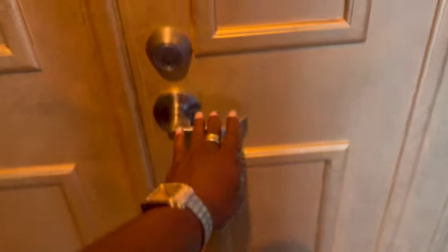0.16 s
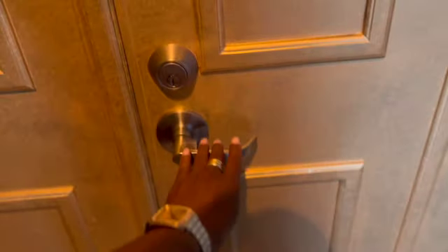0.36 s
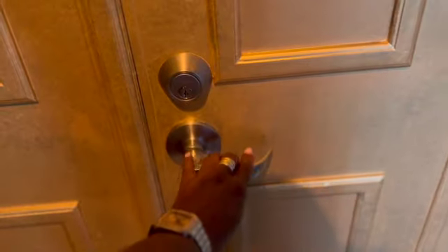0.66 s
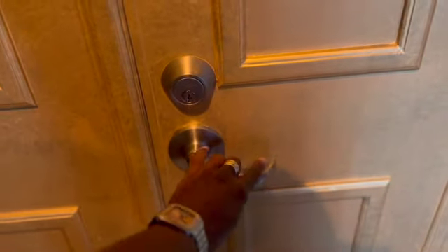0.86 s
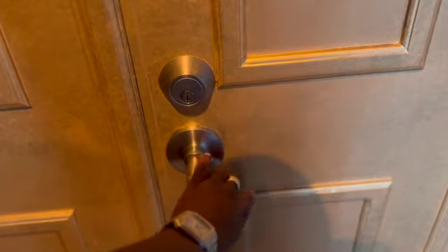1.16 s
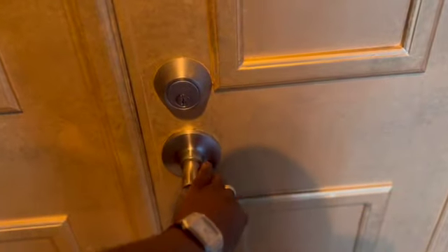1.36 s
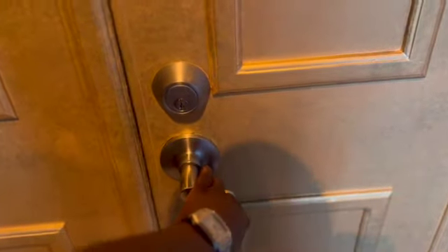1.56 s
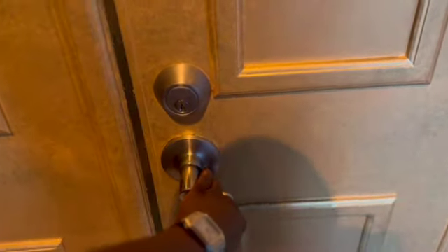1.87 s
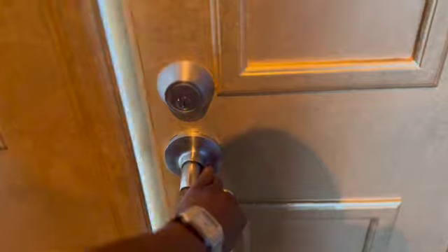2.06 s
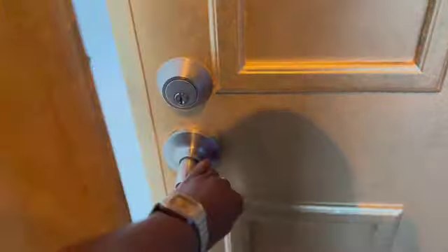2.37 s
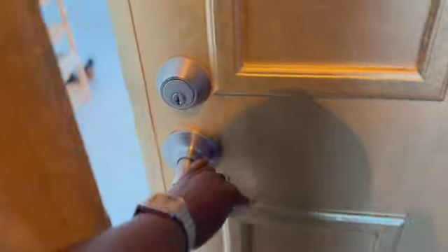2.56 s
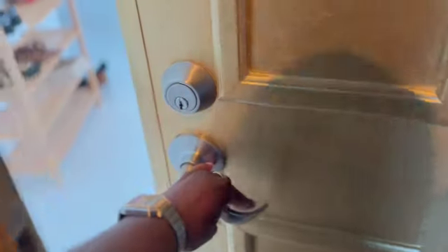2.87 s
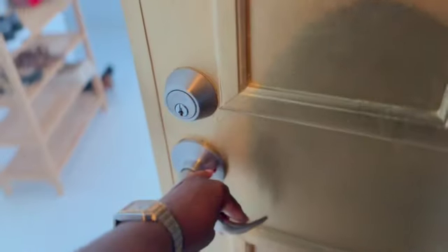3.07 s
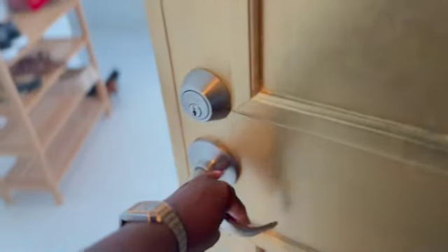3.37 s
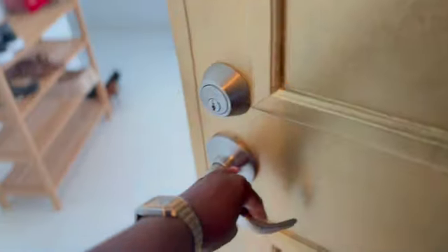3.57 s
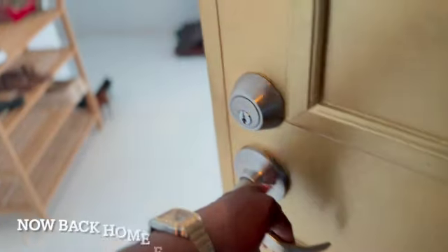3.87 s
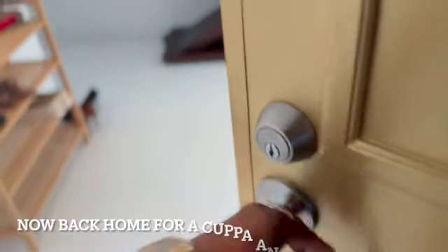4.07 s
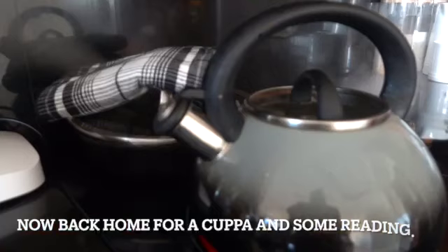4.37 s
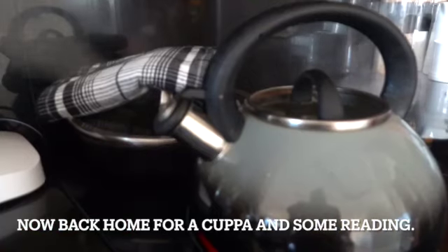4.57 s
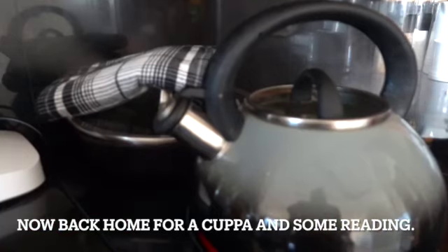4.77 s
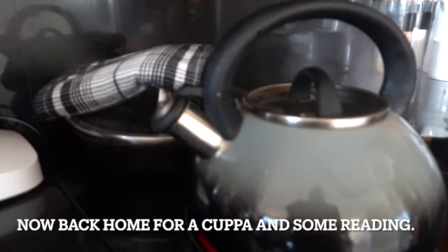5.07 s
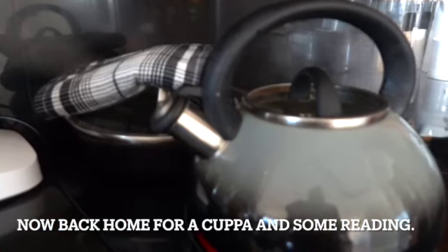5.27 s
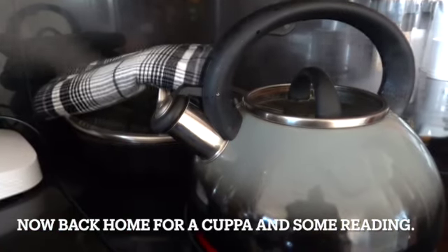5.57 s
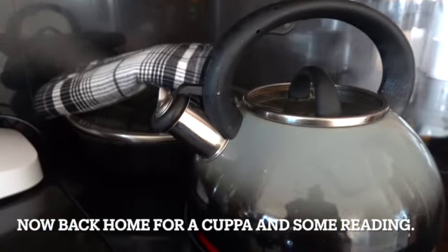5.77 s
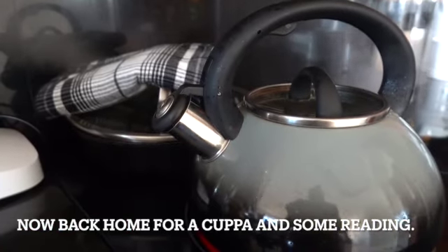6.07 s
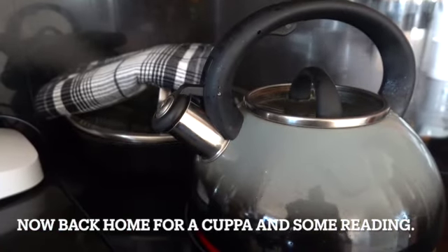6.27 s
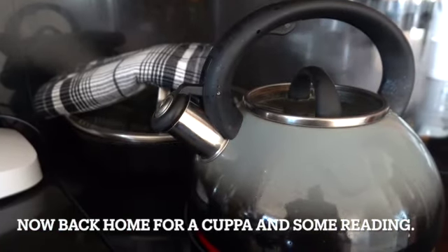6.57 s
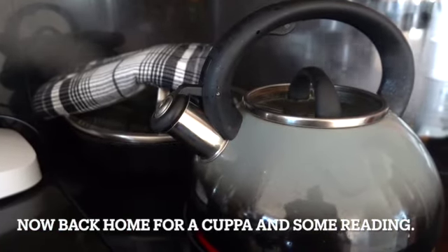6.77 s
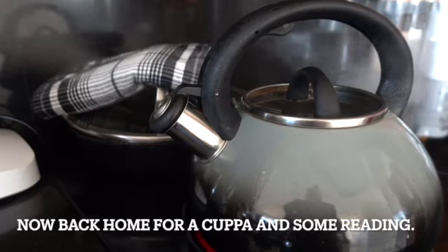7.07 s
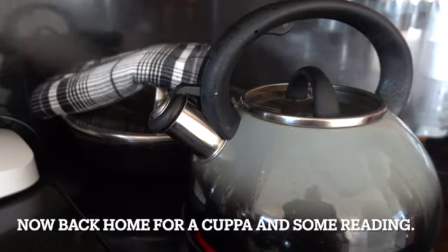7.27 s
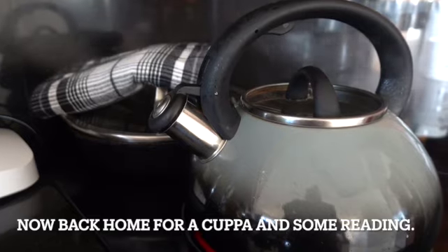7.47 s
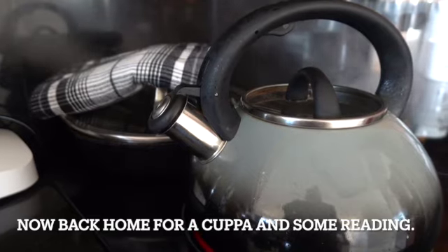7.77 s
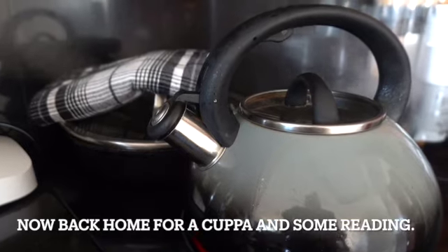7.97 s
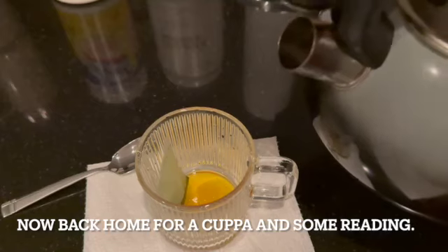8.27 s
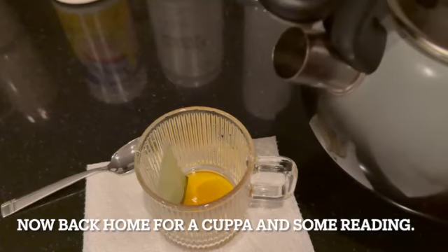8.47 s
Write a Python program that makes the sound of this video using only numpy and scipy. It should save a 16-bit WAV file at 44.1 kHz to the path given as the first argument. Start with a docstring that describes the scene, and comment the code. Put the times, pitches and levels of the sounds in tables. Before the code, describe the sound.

Soft hand rustle and metallic latch clacks over low hallway hum, abruptly followed by a loud, wavering kettle whistle with steam, then near silence.

```python
"""Low building hum and rumble at a front door, heard through a phone's two microphone ports.
A hand swishes and rustles, lever and latch click, thin metal squeaks and the door swings: noise bands and ringing modes.
Then, close up, a kettle at the boil: two whistle modes multiply into sum and difference tones
over steam hiss and a low boil. A cut leads to a quiet kitchen, a steady bed of coloured noise."""
import sys
import numpy as np
from scipy import signal
from scipy.fft import rfft, irfft, next_fast_len
from scipy.io import wavfile
from scipy.ndimage import uniform_filter1d

SR = 44100
rng = np.random.default_rng(int(sys.argv[2]) if len(sys.argv) > 2 else 0)


def decibels_to_gain(level_db):
    """Convert a level in decibels to a linear amplitude gain (20 dB per decade)."""
    exponent = np.asarray(level_db, float) / 20
    return 10 ** exponent


def dump_mix(stems):
    """Bounce the given channels to the path in sys.argv[1] as a 16-bit WAV at rate SR."""
    frames = np.atleast_2d(stems).T  # one column per channel
    limited = np.clip(frames, -1, 1)  # hard clip at full scale
    pcm = np.round(limited * 32767).astype(np.int16)
    wavfile.write(sys.argv[1], SR, pcm)


N = 380935
T = np.arange(N) / SR
DOOR_END_S, KETTLE_END_S = 4.4, 8.187

# how alike the two ports hear the hallway: (frequency [Hz], left-right likeness [0-1])
HALL_ALIKE = [(30, 1), (130, 0.87), (400, 0.36), (1500, 0), (15000, 0.16)]
# how alike they hear steam and kitchen: (frequency [Hz], left-right likeness [0-1])
STEAM_ALIKE = [(30, 0.76), (1500, 1), (3000, 0.5), (5000, 0.4), (7000, 0.06), (9500, 0.3), (14000, 0.55)]
# hand and sleeve swish: (time [s], level [dB])
HAND_SWISH = [(0.0, -78), (0.58, -81.5), (0.95, -71), (1.08, -62.5), (1.22, -65), (1.36, -60),
              (1.54, -68.5), (1.77, -69), (1.95, -63.5), (2.35, -71.5), (2.59, -69.5), (3.05, -78),
              (3.5, -71), (3.67, -77), (4.1, -65), (4.38, -62.5)]


def columns(table):
    """Each column of a curve table, sample by sample."""
    s, *rest = np.transpose(table)
    return [np.interp(T, s, c) for c in rest]


def on_log(points, hz):
    """A (frequency [Hz], value) table read on a log-frequency axis."""
    f, v = np.transpose(points)
    return np.interp(np.log(hz + 1e-3), np.log(f), v)


def noise(points, alike=((1, 1),), left=((1, 0),)):
    """Two channels of coloured noise, rms 1 overall, with likeness and balance set per frequency."""
    size = next_fast_len(N)
    hz = np.fft.rfftfreq(size, 1 / SR)
    inside = (hz >= points[0][0]) & (hz <= points[-1][0])
    likeness = np.clip(on_log(alike, hz), 0, 1)
    mid, side = rfft(rng.standard_normal((2, size)))
    sign = np.array([[1], [-1]])
    pair = np.sqrt(1 + likeness) * mid + np.sqrt(1 - likeness) * side * sign
    colour = decibels_to_gain(on_log(points, hz) + sign * on_log(left, hz) / 2) * inside
    x = irfft(pair * colour, size)[:, :N]
    return x / x.std()


def wander(lo_hz, hi_hz, fall_db):
    """Random motion between two rates, spread 1, weaker by fall_db per Hz at the fast end."""
    return noise([(lo_hz, 0), (hi_hz, -fall_db)])[0]


def pan(x, db):
    """Left minus right level difference in dB."""
    return x * decibels_to_gain(np.array([[db / 2], [-db / 2]]))


def gate(start_s, end_s, rise_s, fall_s):
    """Linear fades of a scene cut."""
    return np.clip((T - start_s) / rise_s, 0, 1) * np.clip((end_s - T) / fall_s, 0, 1)


def ring(modes, t, centre_hz, skirt_db):
    """One blow on a table of modes, peak 1; modes far from the centre are struck less, and all vary a little."""
    hz, db, t60 = np.transpose(modes)[:, :, None]
    chance = rng.standard_normal((3, len(modes), 1))
    db = db + 3.3 * chance[0] - skirt_db * np.abs(np.log2(hz / centre_hz))
    hz = hz * (1 + 0.009 * chance[1])
    x = decibels_to_gain(db - 60 * t / t60) * np.sin(2 * np.pi * hz * t + chance[2])
    x = x.sum(0) * (1 - np.exp(-t / 0.00047))
    return x / np.abs(x).max()


def door_opening():
    """How far the door has swung open, 0 to 1."""
    opens_s, swing_s = 1.67, 0.8
    return np.clip((T - opens_s) / swing_s, 0, 1)


def rumble():
    """The stairwell rumble, low noise that thins once the door stands open."""
    # (frequency [Hz], relative density [dB per Hz])
    rumble_colour = [(13, -40), (22, -20), (43, -1), (54, -10), (68, 1), (102, -9.5), (130, -40),
                     (220, -120)]
    shut_db, open_db = -50, -55.5
    level_db = shut_db + (open_db - shut_db) * door_opening() + 1.7 * wander(1.2, 5.1, 4.7)
    return pan(decibels_to_gain(level_db) * noise(rumble_colour, HALL_ALIKE), -3.5)


def mains_hum():
    """Mains hum: steady sines that waver in level and phase."""
    # (frequency [Hz], level [dB])
    hum_tones = [(59, -51), (119, -51.5), (177, -64), (238, -65.5)]
    out = np.zeros((2, N))
    for hz, db in hum_tones:
        level_db = db + 2.66 * wander(0.98, 11, 15)
        turns = hz * T + 0.08 * wander(0.86, 9.7, 9)
        out += pan(decibels_to_gain(level_db) * np.sin(2 * np.pi * turns), -3.0)
    return out


def room_air():
    """Low hallway noise that rises and falls gently with the hand's swish."""
    # (frequency [Hz], relative density [dB per Hz])
    air_colour = [(64, -30), (108, -5.5), (277, -11), (379, -17.5), (563, -17.5), (613, -14.5),
                  (819, -28.5), (1050, -20.5), (1400, -29), (1820, -82), (3080, -120)]
    swish_db, = columns(HAND_SWISH)
    air_db = -52 + 0.29 * (swish_db + 70)  # -52 dB at a swish of -70 dB
    air_db = air_db + 0.89 * wander(3.3, 37, 4.1)
    return pan(decibels_to_gain(air_db) * noise(air_colour, HALL_ALIKE), -2.2)


def rustles():
    """Level envelopes of body and crisp top: each rustle swells to its peak and dies away."""
    # cloth and skin: (time of peak [s], body level [dB], crisp top level [dB], fall t60 [s])
    rustle_peaks = [(0.64, -85, -80, .1), (0.76, -82, -72, .2), (0.82, -79, -67, .15),
                    (1.0, -64, -72, 0.38), (1.08, -65, -71, 0.1), (1.15, -62, -70, 0.11),
                    (1.19, -54, -70, 0.21), (1.32, -62, -79, 0.51), (1.45, -66, -76, 0.23),
                    (1.505, -48, -56, .12), (1.55, -64, -70, .6), (1.73, -47, -63, 0.1),
                    (1.775, -56.5, -70, .3), (2.13, -71, -80, 0.75), (2.26, -60, -73, .2),
                    (2.62, -68, -74, 1.1), (3.17, -72, -92, 1.2), (3.47, -68, -78, 0.72),
                    (3.39, -78, -77, .5), (3.64, -78, -77, 0.73), (3.81, -72, -90, 0.59),
                    (4.12, -83, -85, 0.38), (4.27, -61, -67.5, 1.4)]
    rise_share = 0.39  # rise time against fall time
    out = 0
    for s, body_db, crisp_db, t60 in rustle_peaks:
        away = np.where(T > s, T - s, (s - T) / rise_share) / t60
        out = out + decibels_to_gain(np.array([[body_db], [crisp_db]]) - 60 * np.minimum(away, 3))
    return out


def hand():
    """Hand and sleeve: noise bands of swish and rustle that share one fast grain."""
    # four bands, each (frequency [Hz], relative density [dB per Hz])
    swish_colour = [(2150, -14), (2650, 1.5), (3100, -0.5), (3700, -11)]
    low_swish_colour = [(1250, 1.5), (1400, -4.5), (1750, -1), (2000, -5), (2250, -15)]
    rustle_colour = [(2410, -21), (4100, 0), (4960, -4), (6120, -3.5), (7490, -12.5), (9000, -14.5),
                     (11700, -55.5), (19800, -120)]
    crisp_colour = [(5180, -43), (8800, -5), (9330, 2.5), (10300, -24), (11300, -6), (13700, -3),
                    (15700, 1)]
    swish_db, = columns(HAND_SWISH)
    nearness = np.clip((T - 4.02) / 0.15, 0, 1)  # the hand comes back past the phone
    low_swish_db = swish_db + 7 * nearness
    body, crisp = rustles()
    body = body + decibels_to_gain(swish_db - 5)  # a steady rustle bed under the peaks
    crisp = crisp + decibels_to_gain(swish_db - 18)
    grain_db = 2.0 * wander(7.5, 270, 12)
    out = pan(decibels_to_gain(swish_db + 0.64 * grain_db) * noise(swish_colour, HALL_ALIKE), -1.4)
    out += pan(decibels_to_gain(low_swish_db + 0.48 * grain_db) * noise(low_swish_colour, HALL_ALIKE), -1.8)
    out += pan(body * decibels_to_gain(grain_db) * noise(rustle_colour, HALL_ALIKE), -0.84)
    out += pan(crisp * decibels_to_gain(1.1 * grain_db) * noise(crisp_colour, HALL_ALIKE), -1.2)
    return out


def knocks():
    """Each knock rings latch and panel, ticks, and leaves a short scatter from the hallway walls."""
    # lever, latch and door: (time [s], latch level [dB], tick level [dB], door panel level [dB],
    # frequency near which the latch modes ring most [Hz])
    blows = [(0.2, -66, -85, -55, 711), (0.683, -46.5, -85, -47, 1030), (0.908, -47.5, -61.5, -65, 1360),
             (1.02, -45, -73, -45, 1090), (1.193, -29, -50.5, -51, 990), (1.215, -36.5, -56.5, -36.5, 710),
             (1.238, -45.5, -63.5, -56, 840), (1.5, -32, -35, -46.5, 1070), (1.725, -39, -44, -43.5, 2750),
             (1.766, -33.5, -52.5, -49, 3000), (1.789, -28, -64.5, -49.5, 1040),
             (1.82, -44, -63.5, -54, 1030), (1.858, -44, -70, -56, 1010), (1.899, -39, -68, -66, 1200),
             (2.148, -47.5, -66.5, -31.5, 1150), (2.272, -39, -51, -46.5, 1090),
             (2.67, -43, -69, -44.5, 999), (2.996, -52, -78, -47, 716), (3.159, -51, -75.5, -47, 746),
             (3.492, -50, -72.5, -48, 746), (4.261, -35, -65.5, -49, 1100)]
    # metal latch and door panel: (frequency [Hz], relative level [dB], t60 [s])
    latch_modes = [(752, 4.5, 0.081), (1070, 4, 0.061), (1110, 7, 0.099), (1435, 5, 0.043),
                   (1760, 6.5, 0.04), (2700, 7.5, 0.035), (3000, 10, 0.041), (4500, -21, 0.038),
                   (5450, -2, 0.064)]
    panel_modes = [(191.6, -2.5, 0.21), (270, -2.5, 0.29), (319, -6.5, 0.27), (370, -8, 0.37),
                   (490, -3.5, 0.19), (643, -5.5, 0.1)]
    out, t = np.zeros((2, N)), T[:SR // 3]
    scatter = noise([(500, -4), (1100, 5), (1600, -5), (3200, -15.5), (3900, -3)], ((1, 0.25),))
    hiss = noise([(3900, -20), (4800, 8.0), (8000, -12), (15500, -8.5)], ((1, .6),))
    boom = noise([(130, 0), (280, -4), (520, 1.0), (700, -7)], ((1, 0.5),))
    tail = decibels_to_gain(-60 * t / 0.27)
    tick_fall, boom_fall = decibels_to_gain(-60 * t / 0.011), decibels_to_gain(-60 * t / 0.58)
    for s, latch_db, tick_db, panel_db, hz in blows:
        here = slice(int(s * SR), int(s * SR) + len(t))
        latch = ring(latch_modes, t, hz, 10.4) + 0.26 * tail * scatter[:, here]
        tick = (1.5 * tick_fall + 0.051 * tail) * hiss[:, here]
        panel = 0.88 * ring(panel_modes, t, 300, .1) + 0.17 * boom_fall * boom[:, here]
        out[:, here] += pan(decibels_to_gain(latch_db) * latch + decibels_to_gain(tick_db) * tick, -1)
        out[:, here] += pan(decibels_to_gain(panel_db) * panel, -4.5)
    return out


def squeaks():
    """Thin metal ring and lever squeak: short unsteady tones, the rougher the stronger their octave."""
    # (time [s], pitch [Hz], level [dB], rise [s], t60 [s], unsteadiness [0-1])
    squeak_tones = [(1.062, 7590, -42.5, .02, 0.15, 0.2), (1.311, 2700, -40, .005, .1, 0.6),
                    (1.33, 2720, -47, .005, 0.092, 0.3), (1.352, 2560, -47, .005, 0.078, 0.55),
                    (1.31, 2250, -44.5, .008, .28, .55), (1.501, 5560, -50, .003, 0.36, 0.42)]
    clean_db, rough_db = -50, 10  # octave against fundamental at unsteadiness 0 and 1
    out = 0
    for s, hz, db, rise, t60, rough in squeak_tones:
        octave_db = clean_db + (rough_db - clean_db) * rough
        t = np.maximum(T - s, 0)
        pitch_hz = hz * (1 + 0.066 * rough ** 2 * wander(22, 390, 6.0))
        phase = 2 * np.pi * np.cumsum(pitch_hz) / SR
        fall_db = db - 60 * np.maximum(t - rise, 0) / t60
        shape = np.minimum(t / rise, 1) * decibels_to_gain(fall_db + 5.0 * rough * wander(30, 300, 3))
        out = out + shape * (np.sin(phase) + decibels_to_gain(octave_db) * np.sin(2 * phase))
    return out


def indoors():
    """Low murmur of the rooms, let out as the door opens."""
    # (frequency [Hz], relative density [dB per Hz])
    murmur_colour = [(120, -12), (160, 0), (280, -3), (380, -16)]
    level_db = -59 + 1.5 * wander(2, 20, 4)
    return pan(door_opening() * decibels_to_gain(level_db) * noise(murmur_colour, HALL_ALIKE), -3)


def airy_puffs():
    """Soft puffs of noise near 6 kHz, each a bell-shaped swell."""
    # (time of peak [s], level [dB], half length [s])
    puff_peaks = [(2.64, -70, .05), (3.17, -67, .07), (3.49, -68, .06), (3.82, -67, .06)]
    # (frequency [Hz], relative density [dB per Hz])
    puff_colour = [(4600, -20), (5300, -4), (5900, 0), (6400, -3), (6900, -20)]
    swell = sum(decibels_to_gain(db) * np.exp(-((T - s) / half) ** 2) for s, db, half in puff_peaks)
    return pan(swell * noise(puff_colour, HALL_ALIKE), -1.5)


def hallway():
    """Everything at the front door, with a dead band near 4 kHz and the right port hearing it first."""
    door = rumble() + mains_hum() + room_air() + hand() + knocks() + squeaks() + indoors() + airy_puffs()
    dead_band = signal.butter(2, [3450, 4350], "bandstop", fs=SR, output="sos")
    door = signal.sosfilt(dead_band, door)
    door[0] = np.roll(door[0], 17)  # left lags, in samples
    return door


def turning(hz):
    """A unit phasor that turns at a changing frequency."""
    return np.exp(2j * np.pi * np.cumsum(hz) / SR)


def whistle_modes():
    """A strong self-sustained upper mode and a ragged lower one, as phasors, and the upper mode's drifting pitch."""
    # upper mode as the steam jet wanders: (time [s], pitch [Hz])
    upper_pitch = [(4.41, 4058), (4.53, 4030), (4.57, 3902), (4.77, 3865), (4.81, 4001), (5.17, 3999),
                   (5.33, 4174), (5.38, 4066), (5.45, 4114), (5.54, 3961), (5.8, 4013), (5.92, 3913),
                   (5.93, 4009), (6.29, 4026), (6.39, 4189), (6.5, 4010), (6.55, 4003), (6.64, 3793),
                   (6.76, 3862), (6.77, 3968), (6.89, 4076), (6.93, 4023), (7.26, 3998), (7.27, 3960),
                   (7.36, 4172), (7.47, 4142), (7.51, 4022), (7.63, 3957), (7.69, 3835), (7.73, 3948),
                   (7.99, 4064), (8.17, 3965)]
    # lower mode, strongest while the upper one sags: (time [s], level [dB])
    lower_level = [(4.41, -48), (4.44, -41), (4.55, -41), (4.59, -28.5), (4.72, -27.5), (4.77, -38),
                   (4.84, -31), (4.865, -42), (4.92, -30), (4.99, -38), (5.11, -30), (5.22, -43),
                   (5.46, -43), (5.59, -31), (5.8, -33), (5.92, -28.5), (5.96, -42), (6.02, -33),
                   (6.29, -36), (6.42, -42), (6.51, -33.5), (6.56, -39), (6.59, -29.5), (6.77, -32),
                   (6.89, -43), (6.97, -32), (7.12, -40), (7.19, -33), (7.24, -40), (7.3, -31), (7.35, -46),
                   (7.61, -36), (7.69, -42), (7.72, -30), (7.84, -32), (8.0, -45), (8.03, -43), (8.1, -36),
                   (8.17, -42)]
    (upper_hz,), (lower_db,) = columns(upper_pitch), columns(lower_level)
    knee_hz = 3982  # the upper mode weakens when its pitch sags under the knee
    sag_db = 0.0256 * np.maximum(knee_hz - upper_hz, 0)
    upper_db = -22 - sag_db + 0.6 * wander(5, 40, 3)
    upper_hz = upper_hz + 6 * wander(8, 40, 3)
    # the lower mode settles between these levels and follows the upper pitch a little
    weak_db, firm_db = -38, -27
    loose = np.clip((firm_db - lower_db) / (firm_db - weak_db), .2, 1)
    lower_hz = 2186 + 0.17 * (upper_hz - knee_hz) + 18 * loose * wander(3, 30, 8.2)
    # the upper mode is saturated: turbulence makes it dip, seldom swell, and shakes its pitch
    dips_db = 1.29 * np.exp(0.58 * wander(13, 550, 24.55))
    shaken_hz = upper_hz + 38 * wander(12, 800, 15)
    upper = decibels_to_gain(upper_db - dips_db + dips_db.mean()) * turning(shaken_hz)
    # turbulence of fixed strength tears the lower mode up when weak and barely moves it when strong
    gusts = decibels_to_gain(-42.5) * (wander(6.5, 220, 23.2) + 1j * wander(9, 250, 36.08))
    flutter_db = 3 * loose * wander(6, 40, 6.8)
    lower = turning(lower_hz) * (decibels_to_gain(lower_db + flutter_db) + gusts)
    return upper, lower, upper_hz


def power(z, k):
    """A whole power of a phasor; a negative one turns it backwards."""
    return (z if k > 0 else np.conj(z)) ** abs(k)


def jet_mixing(upper, lower):
    """The steam jet multiplies the two modes together into sum and difference tones."""
    # the tones mixed: (multiple of upper mode [count], multiple of lower mode [count])
    orders = [(1, 0), (0, 1), (1, -1), (2, 0), (2, -1), (1, 1), (0, 2), (-1, 2), (-1, 3), (3, 0), (2, 1),
              (3, -1)]
    # one for each tone: (level against the upper mode [dB])
    tone_db = [1.34, -15, -30.5, -15.5, -25, -33.5, -37, -53, -53.5, -31, -39, -39.5]
    # where each sits between the ports: (left minus right [dB], left lead [rad], wobble of that lead [rad])
    places = [(.9, .7, .3), (4.7, .27, .25), (.4, 0, .2), (7, .76, .8), (2.3, .65, .5), (2.7, 1.1, .7),
              (2.4, .7, .4), (0, 0, 0), (2.7, .3, .4), (5.5, .56, .7), (3, .4, .8), (3, .4, .8)]
    lag_rad = 1.9  # each further multiplication comes late, so the crests do not stack
    size = np.abs(upper).mean()
    upper_unit, lower_unit = upper / size, lower / np.abs(lower).mean()
    wobble = wander(6.2, 200, 7.3)  # echoes from tiles and worktop shift the two ports against each other
    out = 0
    for (up, low), db, (pan_db, lead, shake) in zip(orders, tone_db, places):
        tone = size * power(upper_unit, up) * power(lower_unit, low)
        tone *= np.exp(1j * lag_rad * (abs(up) + abs(low) - 1))
        ports = np.exp(.5j * (lead + shake * wobble) * np.array([[1], [-1]]))
        out = out + pan(np.sqrt(2) * decibels_to_gain(db) * (tone * ports).real, pan_db)
    return out


def side_resonance(upper_hz):
    """A narrow noisy resonance beside the lower mode, fed more as the upper pitch climbs."""
    hz, half = 2405, 15  # centre and half width, Hz
    level_db = -47 + 0.07 * (upper_hz - upper_hz.mean())
    skirt = [(hz - 5 * half, -18), (hz - half, -4), (hz, 0), (hz + half, -4), (hz + 8 * half, -22)]
    return decibels_to_gain(level_db) * noise(skirt, ((1, 0.99),))


def steam_hiss():
    """Escaping steam: flickering coloured noise, leaning left in the treble."""
    # (frequency [Hz], relative density [dB per Hz])
    steam_colour = [(1300, -40.5), (2200, -12), (2950, -26), (3900, -17), (4870, -11), (5200, -16.5),
                    (5900, -14), (6800, -24.5), (8000, -15), (9000, -24.5), (10200, -24), (12000, -25.5),
                    (12900, -30.5), (14300, -30), (15700, -54.5)]
    # (frequency [Hz], left minus right [dB])
    steam_left = [(1500, 0), (3000, 2.7), (4900, 6), (7000, 5), (10000, 3), (14000, 1.6)]
    level_db = -41 + 1.4 * wander(2.3, 80, 16)
    return decibels_to_gain(level_db) * noise(steam_colour, STEAM_ALIKE, steam_left)


def boiling():
    """The boil: low noise, the same in both ports, wavering a little."""
    # (frequency [Hz], relative density [dB per Hz])
    boil_colour = [(15, -48.5), (25, -19.5), (109, -1.5), (209, -9.5), (415, -4.5), (730, -12.5),
                   (897, -12), (1050, -18), (1500, -10), (1950, -41), (3300, -120)]
    level_db = -57 + 0.74 * wander(2.0, 43, 12.5)
    return decibels_to_gain(level_db) * noise(boil_colour)


def kettle():
    """The kettle close up: whistle tones, side resonance, steam and boil together."""
    upper, lower, upper_hz = whistle_modes()
    return jet_mixing(upper, lower) + side_resonance(upper_hz) + steam_hiss() + boiling()


def quiet_kitchen():
    """The quiet kitchen: a steady bed of coloured noise."""
    # (frequency [Hz], relative density [dB per Hz])
    kitchen_colour = [(13, -30), (22, -3.5), (51, -8.5), (70, -23.5), (195, -36), (267, -30), (411, -52),
                      (2770, -53), (3180, -33), (3400, -48), (5000, -57.5), (6500, -86), (11000, -120)]
    return decibels_to_gain(-65) * noise(kitchen_colour, STEAM_ALIKE)


def scene():
    """Door, kettle and kitchen follow each other by cuts with very short fades."""
    door = hallway() * gate(-0.82, DOOR_END_S + 0.014, 0.97, 0.016)
    whistling = kettle() * gate(DOOR_END_S - .004, KETTLE_END_S, 0.014, 0.026)
    kitchen = quiet_kitchen() * gate(KETTLE_END_S, 10, 0.024, 1)
    return door + whistling + kitchen


def top_cut(x):
    """Nothing passes above the cut-off."""
    return signal.sosfilt(signal.butter(12, 16470, fs=SR, output="sos"), x)


def record(dry):
    """A quick limiter takes off most of whatever rises over its threshold, in both channels alike."""
    level = np.sqrt(uniform_filter1d(np.mean(dry ** 2, 0), size=180) + 1e-12)  # rms over about 4 ms
    gain = np.minimum(decibels_to_gain(-21.0) / level, 1) ** 0.87
    return top_cut(dry * gain)


dry = scene()
out = record(dry)
dump_mix(out)
```